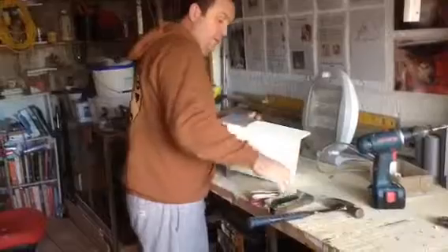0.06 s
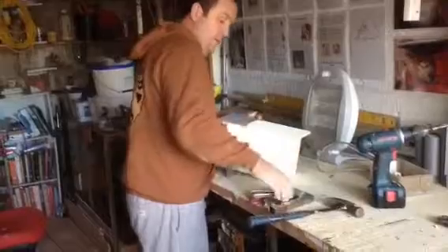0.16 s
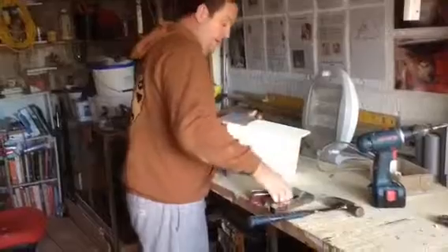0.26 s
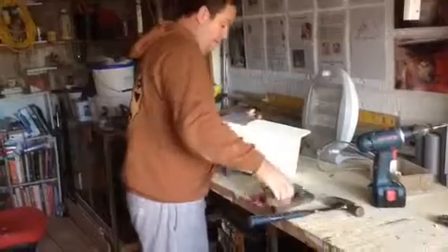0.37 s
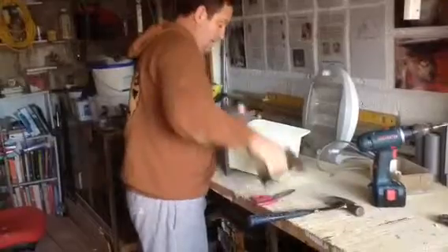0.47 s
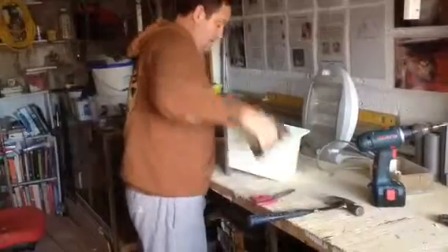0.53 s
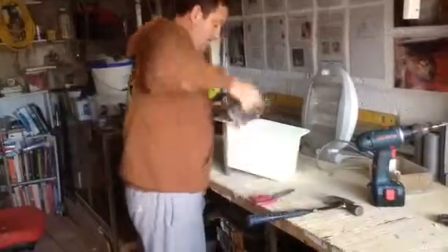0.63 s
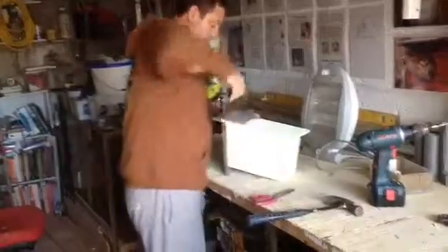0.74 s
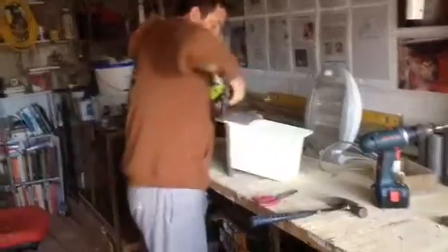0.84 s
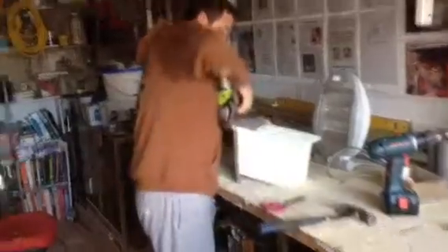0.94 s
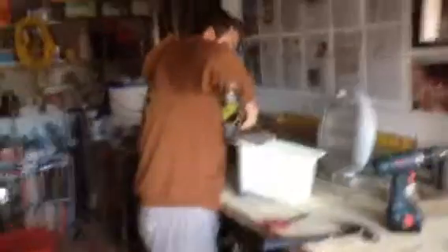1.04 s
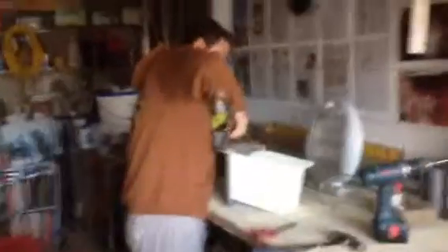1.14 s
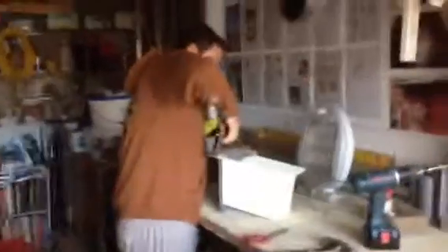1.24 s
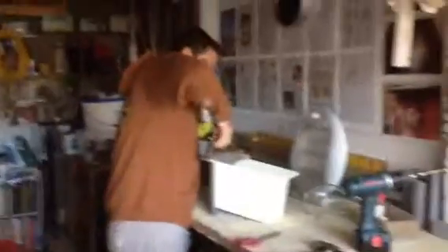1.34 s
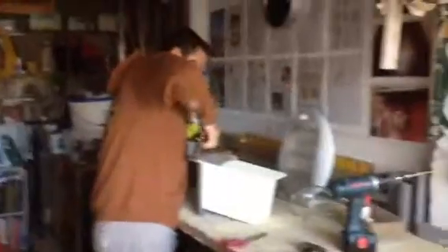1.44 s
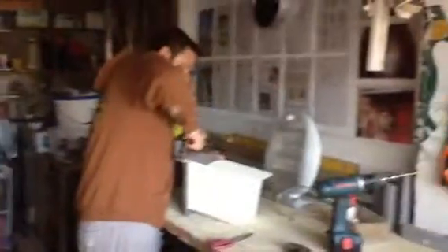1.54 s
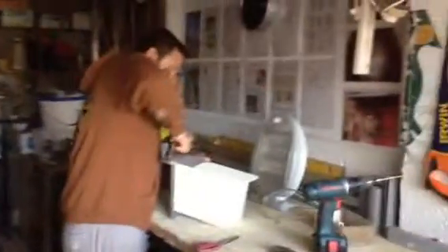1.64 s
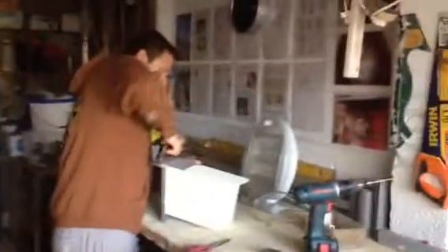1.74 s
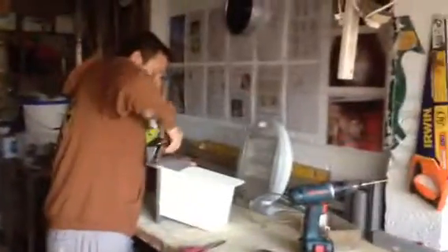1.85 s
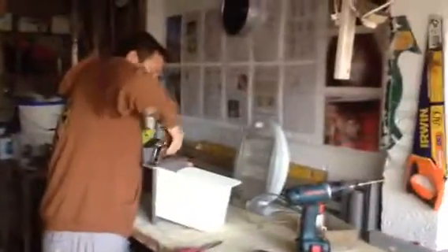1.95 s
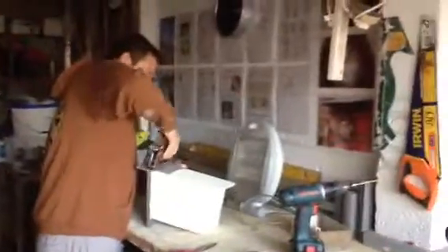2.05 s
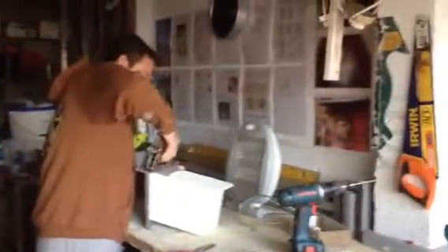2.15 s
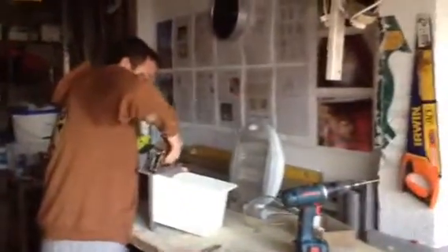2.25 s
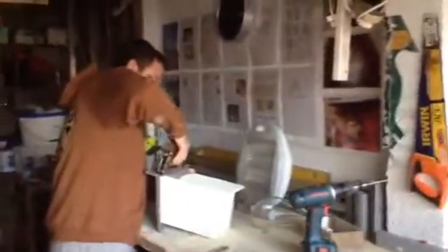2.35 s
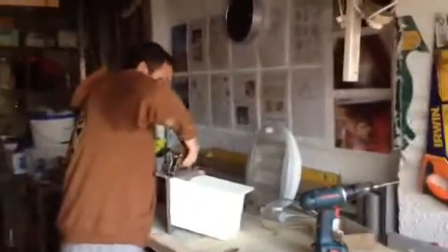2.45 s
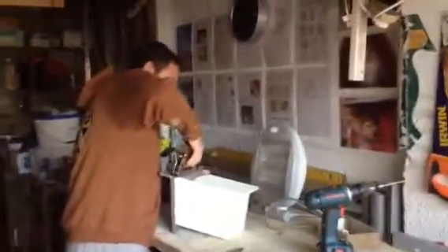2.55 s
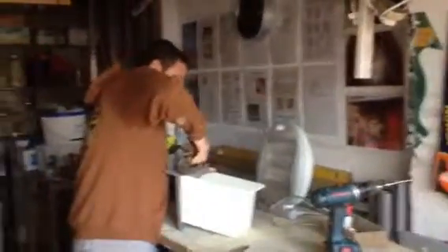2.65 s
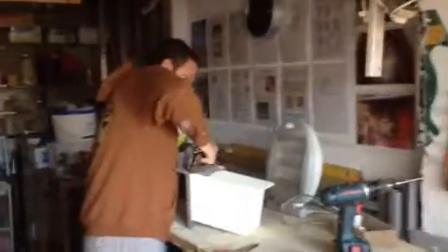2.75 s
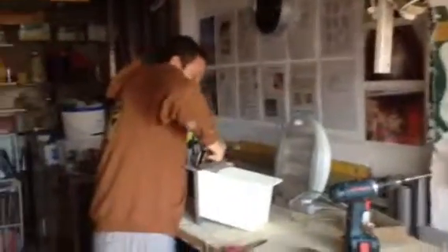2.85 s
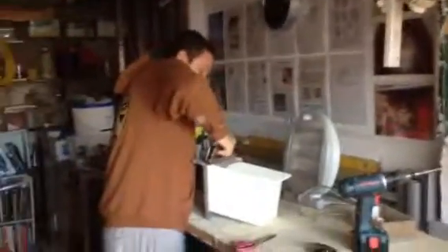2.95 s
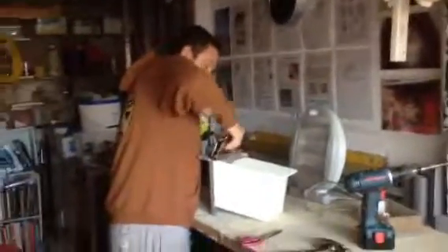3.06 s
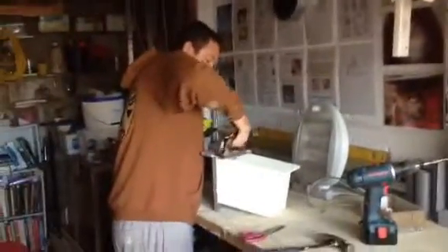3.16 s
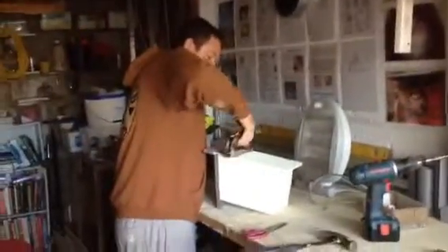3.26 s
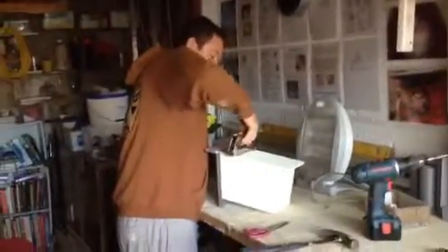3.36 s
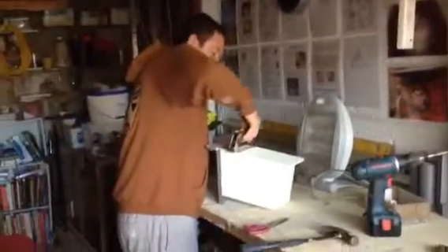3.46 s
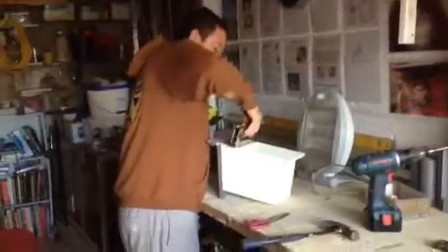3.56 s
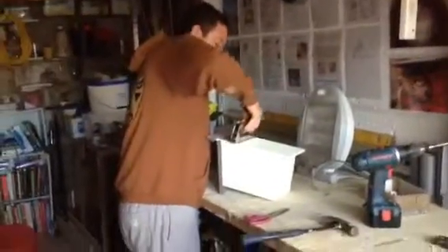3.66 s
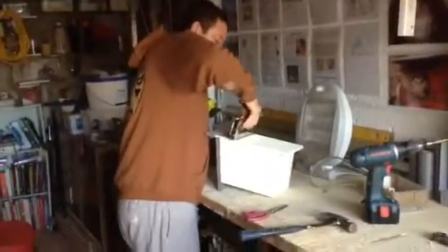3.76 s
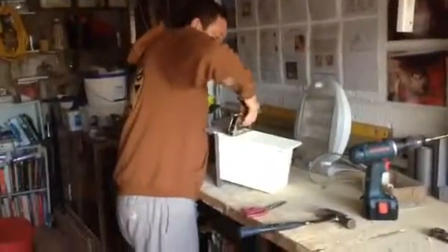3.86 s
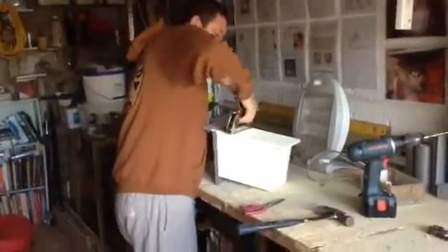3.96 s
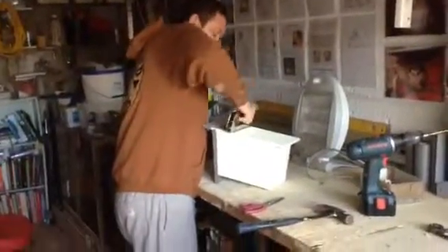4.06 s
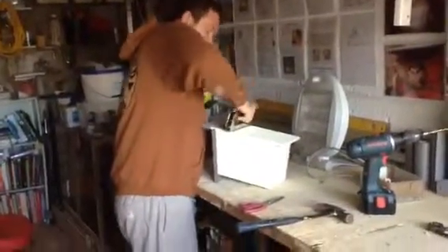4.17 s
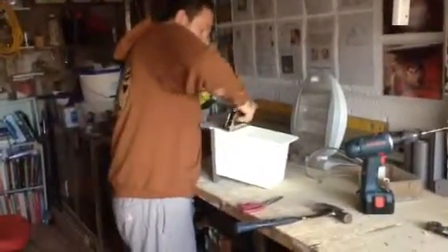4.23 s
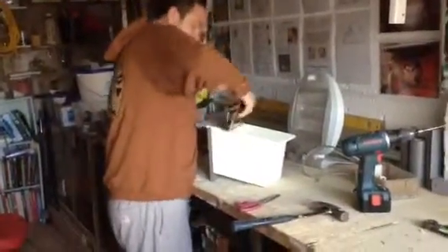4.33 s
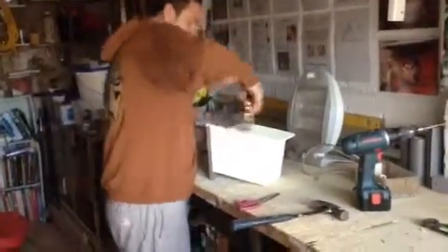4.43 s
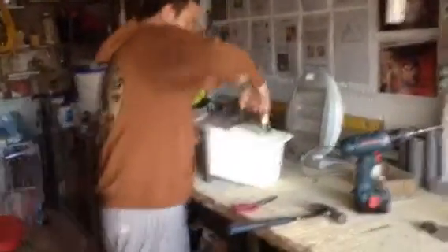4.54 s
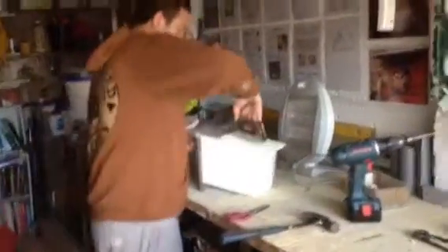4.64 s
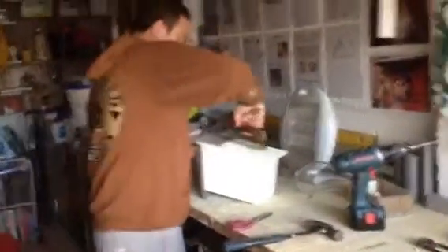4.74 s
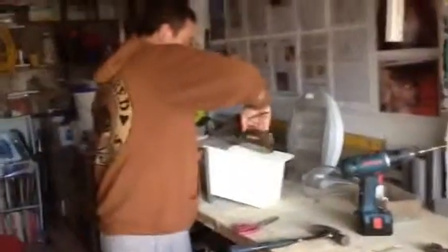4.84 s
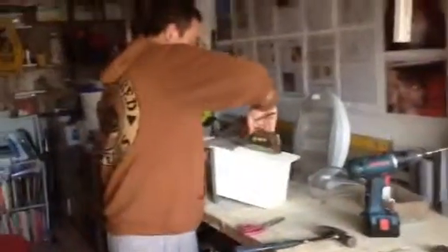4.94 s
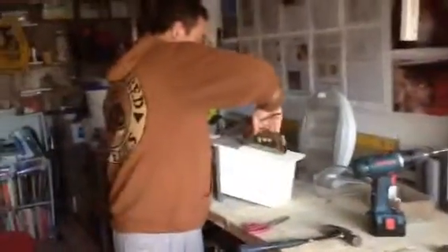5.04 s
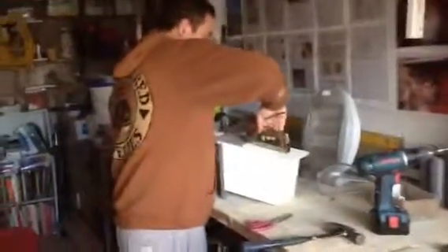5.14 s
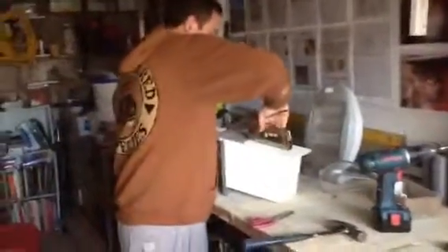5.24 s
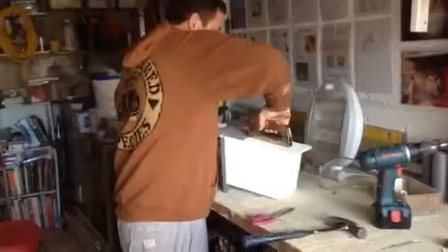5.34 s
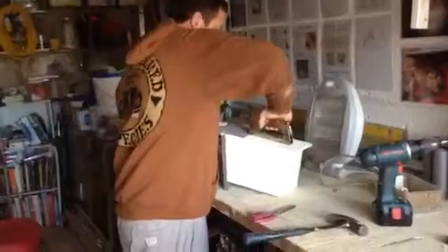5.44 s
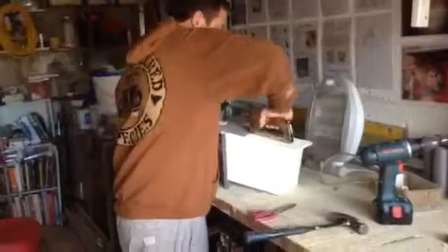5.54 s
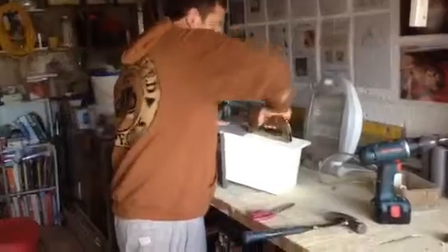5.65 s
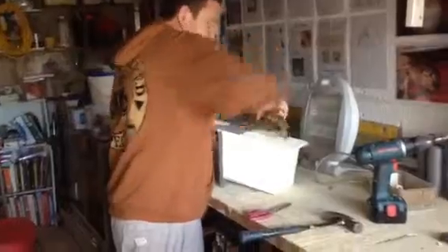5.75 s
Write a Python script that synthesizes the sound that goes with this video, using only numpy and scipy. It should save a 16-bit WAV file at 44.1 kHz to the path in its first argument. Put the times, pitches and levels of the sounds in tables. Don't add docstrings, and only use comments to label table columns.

```python
import sys
import numpy as np
from scipy import signal
from scipy.fft import rfft, irfft, next_fast_len
from scipy.io import wavfile
from scipy.ndimage import uniform_filter1d

SR = 44100
rng = np.random.default_rng(int(sys.argv[2]) if len(sys.argv) > 2 else 0)


def master_out(mix):
    frames = np.transpose(np.atleast_2d(mix))
    ceiling = np.clip(frames, -1, 1)
    pcm = np.round(ceiling * 32767).astype(np.int16)
    wavfile.write(sys.argv[1], SR, pcm)


def convert_level_to_amplitude(level_db):
    exponent = np.asarray(level_db, float) / 20
    return 10 ** exponent


N = 255730

# start in seconds, peak in dB, chatter length in seconds, crack above the body in dB
SHOTS = [
    (1.646, -5, 0.008, 4.5),
    (2.87, -2.5, 0.012, -1),
    (4.13, -4.5, 0.012, 4),
    (5.507, -2, 0.0069, 3),
]
# frequency in Hz, density in dB per Hz
COLOUR_1 = [(59, -52), (100, -15.5), (676, -11.5), (818, 2.5), (1230, -9.5), (1480, -3.5), (1680, -9),
            (4770, -6.5), (7140, -17), (13800, -17.5), (16000, -34.5)]
COLOUR_2 = [(65, -37), (130, -10.5), (607, -19), (865, -2.5), (1070, -13.5), (1870, -2.5), (2300, -9),
            (4490, -10.5), (14100, -25), (15000, -23.5), (16000, -53.5)]
COLOUR_3 = [(59, -43.5), (100, -30), (676, -7), (784, -9), (872, -3), (1330, -10), (1910, -4),
            (2370, -14.5), (7610, -16.5), (15000, -26.5), (16000, -47)]
COLOUR_4 = [(59, -41), (100, -20.5), (260, -12), (424, -15), (818, -1), (1170, -5), (1480, -2.5),
            (2270, -12), (13200, -21), (15000, -23), (16000, -28)]
COLOURS = COLOUR_1, COLOUR_2, COLOUR_3, COLOUR_4
# frequency in Hz, density in dB per Hz
CRACK = [(290, -34), (500, -3.5), (1230, -7.5), (1720, -0.5), (2130, -11), (2850, -8), (7980, -14.5),
         (14700, -25.5), (16000, -33.5)]
LOW_HZ, LOWER_HZ, MAIN_HZ, UPPER_HZ, HIGH_HZ = 3015, 3800, 4008, 4414, 4597


def unit(x):
    return x / np.sqrt(np.mean(x ** 2))


def top(x, db):
    return x * convert_level_to_amplitude(db) / np.sqrt(uniform_filter1d(x ** 2, size=176).max())


def add(out, s, x):
    i = int(s * SR)
    out[i:i + len(x)] += x[:N - i]


def band(x, lo_hz, hi_hz):
    return signal.sosfilt(signal.butter(2, [lo_hz, hi_hz], "bandpass", fs=SR, output="sos"), x)


def shaped(x, spectrum):
    hz, db = np.transpose(spectrum)
    log_hz = np.log(np.fft.rfftfreq(4096, 1 / SR) + 1)
    log_gain = np.interp(log_hz, np.log(hz), db) * np.log(10) / 20
    fold = irfft(log_gain)
    fold[1:2048] *= 2
    fold[2049:] = 0
    response = irfft(np.exp(rfft(fold)))
    return signal.fftconvolve(x, response)[:len(x)]


def rung(x, peaks):
    t = np.arange(4096) / SR
    ring = 0
    for k, (hz, own_width, db) in enumerate(peaks):
        width = own_width + 60 + .03 * hz
        fall = np.exp(-np.pi * width * t)
        ring = ring + (-1) ** k * convert_level_to_amplitude(db) * width * np.sin(2 * np.pi * hz * t) * fall
    return signal.fftconvolve(x, ring)[:len(x)]


def even(x, width_hz):
    spectrum = rfft(x)
    bumps = uniform_filter1d(np.abs(spectrum) ** 2, size=int(width_hz * len(x) / SR))
    return irfft(spectrum / np.sqrt(bumps), len(x))


def chatter(length_s, spiky=.8, rise_s=0.00095):
    t = np.arange(8192) / SR
    noise, size = rng.standard_normal((2, len(t)))
    fall = convert_level_to_amplitude(-20 * t / max(length_s, .002))
    rattle = even(noise * np.exp(spiky * size) * fall, 150)
    return rattle * np.minimum(t / rise_s, 1) * fall / (fall + 0.0053)


def curves(rows):
    s, *columns = np.transpose(rows)
    return [np.interp(np.arange(N) / SR, s, c) for c in columns]


def walk(rate):
    k = int(SR / rate)
    return uniform_filter1d(np.repeat(rng.standard_normal(N // 200), k)[:N], k)


def shots():
    # frequency in Hz, width in Hz, level in dB
    body_1 = [(961.3, 31, -6), (2340, 26, -13.5), (2770, 36, -8.5), (4700, 35, -8), (6900, 43, -14.5),
              (8500, 42, -11), (7760, 14, -6.5), (8793, 45, -2), (9333, 47, -16), (13000, 44, -8)]
    body_2 = [(880, 51, -0.5), (1840, 43, -3.5), (3120, 35, -4.5), (3370, 74, -1), (3988, 93, -2.5),
              (4650, 26, -3), (7090, 38, -17.5), (8000, 27, 3), (8640, 72, -18), (11000, 26, -6.5)]
    body_3 = [(920, 61, -8), (1900, 29, -1), (3280, 22, -0.5), (4200, 37, -19), (4640, 93, 0),
              (7040, 27, -26.5), (7750, 99, -2.5), (8180, 43, -14.5), (9700, 31, -16.5), (9930, 48, -14)]
    body_4 = [(778, 16, 9), (1360, 14, 3), (1450, 28, -12), (1500, 41, -6.5), (2460, 46, -28),
              (4240, 56, -14.5), (7870, 74, 7.5), (9000, 43, -9.5), (11300, 73, -16.5), (12200, 37, -34)]
    panel_lag_s = .002
    out = np.zeros(N)
    bodies = body_1, body_2, body_3, body_4
    for (s, db, length_s, crack_db), body, colour in zip(SHOTS, bodies, COLOURS):
        tick = band(shaped(chatter(0.005), colour), 2400, 19000)
        add(out, s, top(tick, db - 6.5))
        blow = chatter(length_s)
        slam = top(rung(blow, body), db - 11.5) + top(shaped(blow, colour), db + crack_db - 8.5)
        wood = band(slam, 40, 2200)
        add(out, s + .0022, slam - wood)
        add(out, s + 0.002 + panel_lag_s, convert_level_to_amplitude(-5.5) * wood)
    return out


def rebounds():
    # start in seconds, peak in dB, note in Hz, width in Hz
    bounces = [(1.646, -11, 5230, 900), (1.649, -24, 3470, 300), (1.656, -18.5, 4940, 300),
               (1.658, -33, 282, 10), (1.663, -22.5, 890, 60), (1.672, -25, 1510, 200),
               (1.688, -30, 898, 60), (2.872, -20, 3400, 320), (2.8771, -22, 3720, 220),
               (2.878, -28, 857, 10.5), (2.882, -32, 320, 20), (2.889, -21.5, 4600, 300),
               (2.915, -31.5, 1850, 65), (4.1364, -24, 920, 11), (4.1455, -27, 1900, 60),
               (4.15, -25.5, 663, 11), (4.159, -28, 4200, 390), (4.16, -26, 900, 63),
               (4.165, -35.5, 137, 4.5), (4.19, -43, 137, 5.3), (5.5068, -12.5, 4700, 500),
               (5.513, -22, 1540, 100), (5.521, -28, 303, 20.8), (5.523, -26, 796, 60),
               (5.531, -20, 1700, 180), (5.532, -34, 290, 18), (5.534, -22, 910, 51),
               (5.536, -27, 4500, 400), (2.843, -45, 199, 22), (1.618, -46, 250, 21), (.322, -44, 604, 10),
               (.98, -42, 215, 10), (4.09, -44.5, 350, 18), (5.458, -35, 856, 20), (5.785, -49.5, 389, 20),
               (1.49, -52, 143, 5), (3.268, -48, 300, 60), (5.26, -61, 1510, 400), (.318, -47, 1470, 40),
               (4.454, -49, 3820, 86), (4.645, -56.5, 1407, 44), (1.874, -57, 1280, 35),
               (3.94, -49.5, 930, 18.6)]
    # start in seconds, peak in dB, note in Hz
    catches = [
        (.43, -45.5, 695),
        (.445, -49, 1300),
        (.463, -38, 820),
        (.474, -44, 1100),
        (0.496, -44, 1000),
        (.515, -42.5, 560),
        (.528, -47, 910),
    ]
    bounce_s, slide_s, slide_db = 0.0037, 0.0025, -32
    held_db = -55.5
    out = np.zeros(N)
    for s, db, hz, width_hz in bounces:
        add(out, s, top(rung(chatter(bounce_s), [(hz, width_hz, 0)]), db))
    for s, db, hz in catches:
        add(out, s, top(rung(chatter(bounce_s), [(hz, 60, 0)]), db))
    for s, db, *_ in SHOTS:
        rub = unit(band(rng.standard_normal(SR // 25), 1500, 12000))
        add(out, s - len(rub) / SR, convert_level_to_amplitude(held_db) * rub * np.hanning(len(rub)) ** .3)
        slide = band(chatter(bounce_s, rise_s=slide_s), 2500, 12000)
        add(out, s - slide_s, top(slide, db + slide_db))
    return out


def wash():
    level_db, rise_s, t60_s, treble_t60_s = -11.5, .006, .14, .125
    late_db, late_t60_s = -26.5, .5
    out, t = np.zeros(N), np.arange(SR // 2) / SR
    for (s, db, *_), colour in zip(SHOTS, COLOURS):
        early = shaped(rng.standard_normal(len(t)), colour)
        late = shaped(rng.standard_normal(len(t)), colour)
        early_low = band(early, 220, 7000)
        treble = band(early, 220, 17000) - early_low
        tail = early_low * convert_level_to_amplitude(-60 * t / t60_s) + treble * convert_level_to_amplitude(-60 * t / treble_t60_s)
        tail += band(late, 300, 6000) * convert_level_to_amplitude(late_db - 60 * t / late_t60_s)
        rise = np.minimum(t / rise_s, 1) + 1e-6
        add(out, s + .003, convert_level_to_amplitude(db + level_db) * rise * tail / np.std(early))
    return out


def panel():
    # start in seconds, note in Hz, level in dB, rise in seconds, 60 dB decay in seconds
    tones = [(4.134, 930, -9, .006, .06), (4.132, 1520, -15, .003, .035), (4.142, 1980, -14, .004, .05),
             (4.135, 3300, -22, .003, .08), (5.5062, 850, -8, .004, .05), (5.5105, 1600, -15, .003, .05),
             (5.514, 550, -17, .004, .08), (4.1305, 3750, -13, .003, .06), (4.137, 4600, -17, .004, .07),
             (5.521, 780, -16, .004, .05), (5.531, 900, -18, .004, .05), (1.6475, 3480, -8, .002, .04),
             (1.647, 1540, -17, .003, .04), (1.648, 900, -16, .003, .07), (1.654, 4950, -18, .003, .04),
             (2.8715, 3200, -10, .002, .04), (2.8725, 3750, -5, .006, .05), (2.871, 1870, -18, .003, .07),
             (2.875, 870, -14, .005, .09), (.315, 640, -31, .01, .05), (.314, 1480, -42, .004, .07),
             (5.32, 2400, -62, .006, .12), (5.32, 2650, -66, .006, .15), (1.872, 1270, -58, .004, .1),
             (1.872, 2600, -60, .004, .1), (.463, 800, -34, .006, .1), (5.575, 1720, -42, .008, .12),
             (3.259, 210, -33, .008, .09), (3.262, 1200, -48, .003, .12), (.951, 850, -33, .002, .05),
             (.972, 230, -36, .008, .12), (.4, 480, -42, .004, .12), (.5, 200, -40, .006, .1)]
    out, t = np.zeros(N), np.arange(SR // 8) / SR
    for s, hz, db, rise_s, t60 in tones:
        swell = np.sin(np.pi / 2 * np.clip(t / rise_s, 0, 1)) ** 2
        add(out, s, convert_level_to_amplitude(db - 60 * t / t60) * swell * np.sin(2 * np.pi * hz * t))
    return out


def creep():
    # start in seconds, end in seconds, level in dB (the swell ends 5.5 dB below it), creak in Hz,
    # creak share in dB
    strains = [
        (1.499, 1.601, -54, 4124, -7.5),
        (2.727, 2.82, -57.5, 3627, -9),
        (3.99, 4.089, -49.5, 3788, -11.5),
        (5.344, 5.444, -51.5, 4300, -12),
    ]
    out = np.zeros(N)
    for start_s, end_s, db, hz, creak_db in strains:
        t, length_s = np.arange(8192) / SR, end_s - start_s
        rub = rng.standard_normal(len(t)) * np.exp(0.77 * rng.standard_normal(len(t)))
        creak = unit(band(rub, hz - 200, hz + 200))
        swell = convert_level_to_amplitude(db - 11 * (1.5 - t / length_s)) * (t < length_s) * np.minimum(t / .06, 1)
        add(out, start_s, swell * (unit(shaped(rub, CRACK)) + convert_level_to_amplitude(creak_db) * creak))
    return out


def ticks():
    # frequency in Hz, width in Hz, level in dB
    steel_peaks = [(1810, 78, -9), (2970, 23, -7), (3930, 86, -6), (4440, 60, -3), (5030, 25, -7),
                   (6100, 11, -5), (7960, 220, 3), (8400, 58, -10.5), (12600, 46, -20), (13200, 26, -17.5)]
    # start in seconds, peak in dB, loudest ring in Hz
    slips = [
        (1.594, -40, 4300),
        (2.816, -39, 3475),
        (4.081, -40.5, 3800),
        (4.0852, -39, 3523),
        (5.4558, -38, 5600),
    ]
    # start in seconds, peak in dB, loudest ring in Hz, brightness in dB
    returns = [
        (0.397, -27.5, 4440, -3),
        (1.873, -43, 4300, -9),
        (1.964, -44, 3910, -8.5),
        (2.09, -67.5, 4000, -10),
        (3.1045, -41, 3780, -6),
        (4.38, -58, 1600, -9),
        (4.3906, -40, 4070, -8),
        (4.477, -45, 3735, -2.5),
    ]
    shifts = [(0.3134, -54, 4450, -7), (0.4837, -42.5, 4070, -6), (0.638, -57, 3850, -1.5),
              (0.9509, -37, 3120, -17), (1.368, -61.5, 3945, -10), (2.7407, -65.5, 4040, -6.5),
              (3.26, -47, 4100, -14), (4.456, -53, 3930, 4.5), (4.644, -54.5, 3950, 3),
              (5.0869, -56, 3600, -8), (5.1091, -59, 7490, -7), (5.136, -49.5, 3160, -28),
              (5.155, -58, 7440, -3), (5.274, -68.5, 7500, -1), (5.692, -67.5, 4114, 9),
              (5.787, -63, 3380, -8.5)]
    # brightness dB (slips), housing dB, length s, rise s
    contacts = [(*row, -6, -9, 0.011, 0.0039) for row in slips]
    contacts += [(*row, -14, 0.017, 0.0009) for row in returns]
    contacts += [(*row, -1.5, 0.0089, 0.0009) for row in shifts]
    air_db = -8
    out = np.zeros(N)
    for s, db, hz, bright_db, housing_db, length_s, rise_s in sorted(contacts):
        blow = chatter(length_s, rise_s=rise_s)
        steel = top(rung(blow, steel_peaks), -13.5) + top(shaped(blow, CRACK), 0)
        add(out, s, top(rung(blow, [(hz, 100, 0)]), db - 5.0) - top(band(steel, 3300, 6200), db - 9.0))
        add(out, s, top(band(steel, 900, 2800), db + housing_db))
        add(out, s, top(band(steel, 6000, 17000), db + bright_db))
        add(out, s, top(band(blow, 9500, 15500), db + bright_db + air_db))
    return out


def springs():
    # start in seconds, note in Hz, level in dB, 60 dB decay in seconds
    leaves = [(.396, 12000, -60, .3), (1.51, HIGH_HZ, -80, .5), (1.647, 2530, -66, 1.2),
              (1.966, MAIN_HZ, -74, 1.8), (1.97, UPPER_HZ, -72, 0.5), (1.876, HIGH_HZ, -72, 0.3),
              (2.872, 3660, -63, 0.7), (3.17, 1974, -75, 2.), (4.02, LOWER_HZ, -76, 0.94),
              (3.27, LOWER_HZ, -75, 1.8), (4.134, LOWER_HZ, -61, .6), (4.13, 1930, -58, .5),
              (4.133, 4200, -60, 0.54), (4.131, 1500, -60, .5), (4.645, MAIN_HZ, -78, 1),
              (4.48, LOWER_HZ, -74, 2.5), (4.5, MAIN_HZ, -79, 2), (5.55, LOW_HZ, -68, 1.),
              (5.508, HIGH_HZ, -63, 1.2), (5.506, 3700, -60, 0.5), (5.692, MAIN_HZ, -71, 3)]
    grips = [.5, 1.96, 2.4, 3.1, 3.26, 3.55, 4.39, 4.77, 5.7, 5.785]
    out, t = np.zeros(N), np.arange(SR // 2) / SR
    for s, hz, db, t60 in leaves:
        waver = convert_level_to_amplitude(3.5 * walk(30)[:len(t)])
        stop_s = min(grip for grip in grips if grip > s + .05)
        free = np.clip((stop_s - s - t) / 0.0062, 0, 1)
        note = np.sin(2 * np.pi * hz * t + 2 * np.log(waver))
        add(out, s, convert_level_to_amplitude(db - 60 * t / t60) * note * waver * free)
    return out


def squeaks():
    # start in seconds, length in seconds, note in Hz, level in dB, glide as a share of the note
    cries = [(.0, 0.24, 4610, -74, 0.), (.1, 0.055, 1750, -68, 0.021), (.18, 0.077, 3900, -81, 0.),
             (1.205, 0.066, 2327, -73, 0.), (1.305, 0.028, 4670, -66, 0.), (1.435, 0.044, 2040, -72, 0.03),
             (1.44, 0.035, 2324, -75, 0.), (1.52, .03, 4400, -72, 0.), (1.964, 0.055, 1310, -63.5, .24),
             (2.12, .06, MAIN_HZ, -80, 0.), (1.88, .06, 2550, -78, 0.), (2.08, .03, 4800, -80, 0.),
             (3.05, .05, 1900, -70, 0.), (5.62, .09, HIGH_HZ, -74, 0.), (4.21, .07, 3210, -58.5, 0.),
             (4.24, 0.2, 3280, -67, 0.), (4.285, .06, 2503, -66, 0.), (4.335, 0.066, 2340, -69, 0.016),
             (4.25, 0.12, 4600, -72, 0.), (4.26, 0.067, 660, -61, 0.0061), (4.4, 0.067, 3005, -71, 0.),
             (4.3, .1, LOW_HZ, -72, 0.), (5.37, .08, 4064, -73, 0.), (5.14, 0.066, 874, -56.5, 0.029),
             (4.645, .06, 1365, -70, 0.0081), (4.72, 0.054, 1340, -73, 0.), (.7, .04, 1500, -69, 0.),
             (.7, .1, 2330, -77, 0.023)]
    out, t = np.zeros(N), np.arange(SR // 4) / SR
    for s, length_s, hz, db, glide in cries:
        part = np.clip(t / max(length_s, .01), 0, 1)
        pitch = hz * (1 + glide * part + .003 * walk(60)[:len(t)])
        swell = np.sqrt(np.abs(np.sin(np.pi * part ** .6))) * convert_level_to_amplitude(3.5 * walk(70)[:len(t)])
        add(out, s, convert_level_to_amplitude(db) * swell * np.sin(2 * np.pi * np.cumsum(pitch) / SR))
    return out


def knocks():
    # start in seconds, peak in dB, panel note in Hz, thud in dB, contact length in seconds
    touches = [(0.315, -42, 603, -60, 0.014), (0.621, -48, 523, -66, 0.017), (0.709, -55, 1500, -58, 0.013),
               (0.95, -29, 1150, -35, 0.017), (1.596, -33, 1030, -41, 0.018),
               (2.818, -37.5, 910, -45, 0.021), (3.259, -34, 877, -47, 0.018),
               (3.56, -58, 461, -54.5, 0.015), (3.939, -50, 920, -76, 0.013),
               (4.084, -32.5, 851, -56, 0.01), (5.138, -31, 872, -44, 0.015),
               (5.324, -57.5, 2390, -74, 0.012), (5.457, -34.5, 822, -42.5, 0.013)]
    # frequency in Hz, width in Hz, level in dB
    wood_peaks = [(191, 120, 3), (589.6, 11, -5.5), (700, 17, -8), (896, 67, -7.5), (1180, 14, -22),
                  (1600, 57, -16.5), (2120, 93, -12), (2440, 22, -15)]
    out = np.zeros(N)
    for s, db, hz, thud_db, length_s in touches:
        blow = chatter(length_s)
        wood = rung(blow, wood_peaks)
        add(out, s, top(band(wood, 580, 2800), db - 9))
        add(out, s, top(rung(blow, [(hz, 30, 0)]), db - 5.5))
        add(out, s, top(band(shaped(blow, CRACK), 1000, 4500), db - 13))
        add(out, s + 0.0012, top(band(wood, 93, 220), thud_db))
    return out


def drag():
    # time in seconds, level in dB, treble share in dB
    strokes = [
        (.33, -73, -1.5),
        (.37, -52, -28),
        (.395, -42, 9),
        (.44, -43, -20),
        (.465, -41, -22),
        (.49, -42, -13),
        (.52, -43, -17),
        (.545, -70.5, -5),
        (.6, -68, -1),
    ]
    # frequency in Hz, width in Hz, level in dB
    bench = [(193, 17, -7.5), (490, 20, 1.5), (850, 14, 2), (1030, 50, -3), (1440, 24, -5), (1760, 77, -27),
             (2050, 30, -10.5)]
    db, treble_db = curves(strokes)
    start_s, end_s = strokes[0][0], strokes[-1][0]
    on = np.interp(np.arange(N) / SR, [start_s - .02, start_s, end_s, end_s + 0.028], [0, 1, 1, 0])
    slips = rng.standard_normal(N) * np.exp(1.1 * rng.standard_normal(N)) * convert_level_to_amplitude(5 * walk(60))
    jingle = unit(band(shaped(slips, CRACK), 1700, 8900))
    return on * convert_level_to_amplitude(db) * (unit(rung(slips, bench)) + convert_level_to_amplitude(treble_db) * jingle)


def strip():
    # start in seconds, length in seconds, level in dB, centre in Hz
    brushes = [
        (.01, 0.053, -73, 7000),
        (0.803, 0.057, -64, 5740),
        (1.138, 0.068, -68, 4900),
        (2.128, 0.44, -77, 5400),
        (3.45, 0.13, -75.5, 6990),
        (4.038, .02, -68.5, 7200),
    ]
    out, t = np.zeros(N), np.arange(SR // 2) / SR
    for s, length_s, db, hz in brushes:
        grains = rng.standard_normal(len(t)) * convert_level_to_amplitude(3.1 * walk(40)[:len(t)])
        width = 0.17 + 0.022 / length_s
        swell = np.sin(np.pi * np.clip(t / length_s, 0, 1)) ** .5
        hiss = band(grains, hz / (1 + width), min(hz * (1 + width), 16000))
        add(out, s, convert_level_to_amplitude(db) * swell * unit(hiss))
    return out


def stir():
    # time in seconds, movement in dB, crispness of the strip in dB
    moves = [(0, 4.5, 4.5), (.34, 6, 6.5), (.5, 22, -1.5), (.545, 7, 1), (.68, 8.5, 10), (.76, 1.5, 5),
             (1.44, -0.13, 4.5), (1.95, -5.5, 1), (2.29, -5, 3), (2.55, -7.5, -1.8), (3.25, -6, 2),
             (3.45, -8, -6.5), (3.9, -5.5, -4), (4.6, -7, 1.2), (5.05, -2, 1), (5.28, 0.5, -6.5),
             (5.45, 8.5, -6), (5.8, 4, -8)]
    lean_db, lean_s, let_go_s = 7.5, 0.66, 0.055
    shiver_db, shiver_hiss_db, shiver_peak_s = 4.5, 4, 0.23
    movement, crisp = curves(moves)
    since = np.arange(N) / SR - np.array(SHOTS)[:, :1]
    lean = np.exp(-np.abs(since) / np.where(since < 0, lean_s, let_go_s)).sum(axis=0)
    after = np.maximum(since, 0) / shiver_peak_s
    shiver = (after * np.exp(1 - after)).sum(axis=0)
    low = 1.05 * movement + lean_db * lean
    middle = movement + shiver_db * shiver
    hiss = 0.61 * movement + crisp + shiver_hiss_db * shiver
    return low, middle, hiss


def rustle():
    # frequency in Hz, density in dB per Hz
    hush = [(18, -75), (30, -34), (199, -5), (266, -9), (512, -9.5), (554, -13.5), (600, -12), (1630, -16),
            (2680, -22.5), (4420, -22), (5900, -26.5), (14800, -36), (16000, -37)]
    low, middle, hiss = (c - np.median(c) for c in stir())
    out, swell, padded = 0, walk(16), next_fast_len(N)
    air = rfft(shaped(rng.standard_normal(N), hush), padded)
    octave = np.log2(np.fft.rfftfreq(padded, 1 / SR) + 1)
    for centre in np.arange(5, 14.6, .5):
        weights = [np.interp(centre, np.log2([250, 1400, 9000]), row) for row in np.eye(3)]
        db = weights[0] * low + weights[1] * middle + weights[2] * hiss
        share = np.clip(1 - 2 * np.abs(octave - centre), 0, 1)
        out = out + convert_level_to_amplitude(db + 2.3 * swell + 2.7 * walk(23)) * irfft(air * share, padded)[:N]
    usual = np.sqrt(np.median(uniform_filter1d(out ** 2, size=4410)))
    return convert_level_to_amplitude(-67.5) * out / usual


def room():
    # frequency in Hz, 60 dB decay in seconds
    decay = [(100, 0.38), (260, 0.39), (700, 0.14), (1840, 0.14), (4850, 0.135), (12800, 0.17)]
    level_db, first_echo_s = -6, 0.004
    late_db, late_treble_db, late_t60_s = -27.5, -18, 0.55
    bass_db = -5.5
    t = np.arange(SR // 2) / SR
    hz, t60 = np.transpose(decay)
    noise, echoes = rfft(rng.standard_normal(len(t))), 0
    octave = np.log2(np.fft.rfftfreq(len(t), 1 / SR) + 1)
    for centre in np.arange(6, 15):
        share = np.clip(1 - np.abs(octave - centre), 0, 1)
        early = convert_level_to_amplitude(-60 * t / np.interp(centre, np.log2(hz), t60))
        dulling_db = np.interp(centre, [12, 14], [0, late_treble_db])
        late = convert_level_to_amplitude(late_db + dulling_db - 60 * t / late_t60_s)
        bass = convert_level_to_amplitude(np.interp(centre, [7, 8.5], [bass_db, 0]))
        echoes = echoes + irfft(noise * share, len(t)) * (early + late) * bass
    echoes *= np.clip(t / first_echo_s - .5, 0, 1)
    echoes *= convert_level_to_amplitude(level_db) / np.sqrt(np.sum(echoes ** 2))
    echoes[0] = 1
    return echoes


def scene():
    blows = shots() + rebounds()
    near = ticks() + knocks() + drag() + creep() + strip()
    low_cut = signal.butter(4, 111, "highpass", fs=SR, output="sos")
    near, blows = signal.sosfilt(low_cut, [near, blows])
    echo_share = 0.6
    heard = signal.fftconvolve(near + echo_share * blows, room())[:N] + (1 - echo_share) * blows
    return (heard * convert_level_to_amplitude(-2.0) + wash() + rustle() + squeaks() + springs() + panel())[None]


def roll_off(x):
    return signal.sosfilt(signal.butter(12, 16500, fs=SR, output="sos"), x)


def record(dry):
    bump = signal.sosfilt(signal.butter(2, 55, fs=SR, output="sos"), dry ** 2)
    mic_hiss = unit(band(rng.standard_normal(dry.shape), 4000, 15000))
    dry = dry + convert_level_to_amplitude(-84.5) * mic_hiss
    held = np.tanh(1.5 * dry) / 1.5 + .04 * bump
    cut = signal.sosfilt(signal.ellip(8, .2, 35, 15450, fs=SR, output="sos"), held)
    return roll_off(cut)


dry = scene()
out = record(dry)
master_out(out)
```